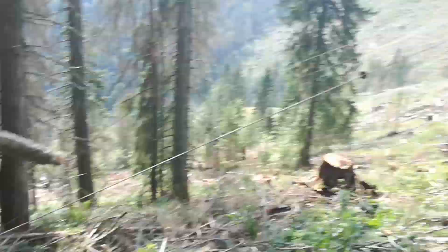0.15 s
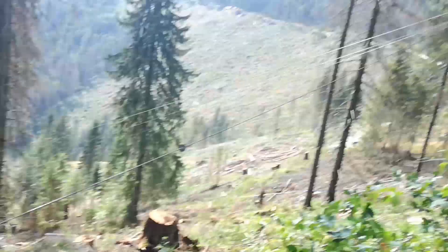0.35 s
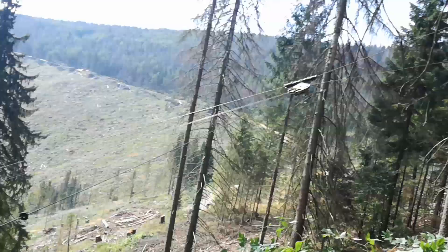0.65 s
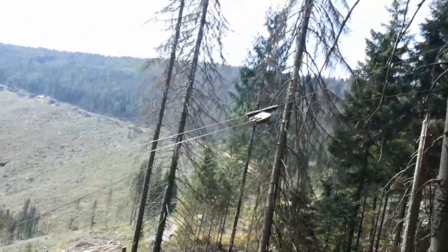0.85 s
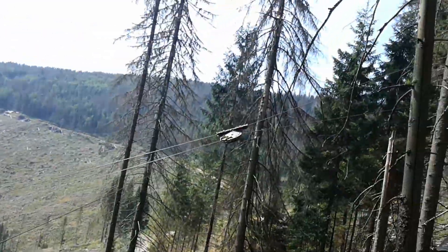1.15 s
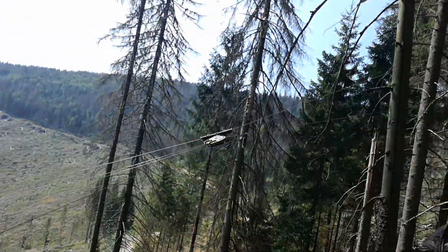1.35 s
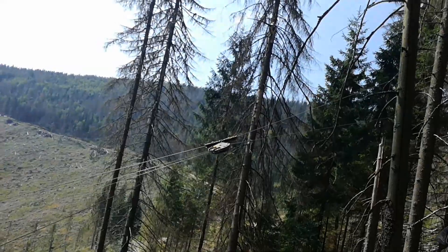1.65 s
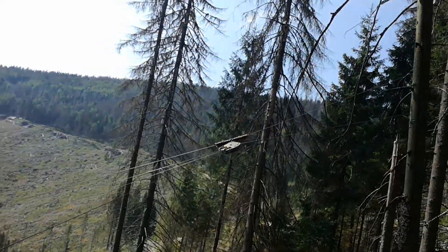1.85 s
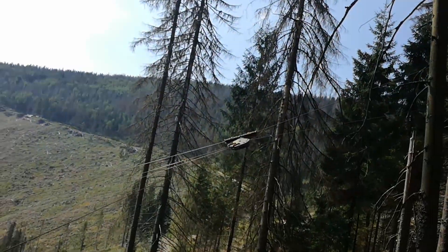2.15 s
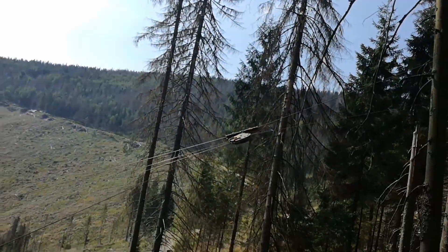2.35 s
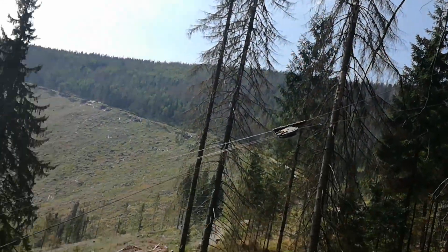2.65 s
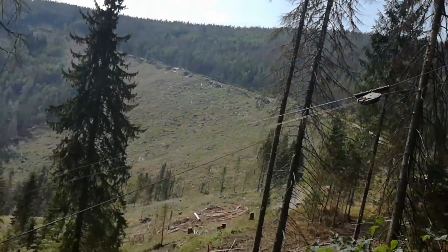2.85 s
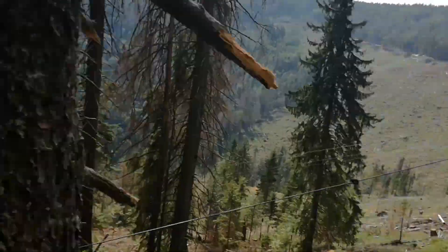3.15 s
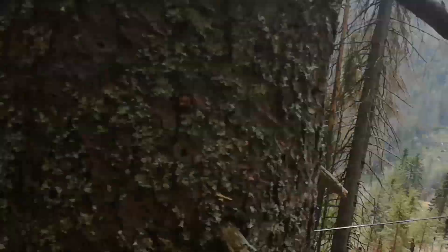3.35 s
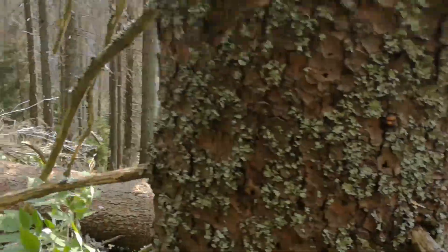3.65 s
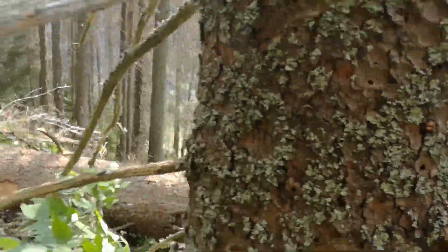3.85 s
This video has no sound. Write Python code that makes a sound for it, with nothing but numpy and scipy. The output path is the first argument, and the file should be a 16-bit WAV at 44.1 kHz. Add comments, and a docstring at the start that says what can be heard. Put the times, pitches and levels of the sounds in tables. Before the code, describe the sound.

Wood knocks ring out on a wooded slope, with scattered echoes, light wind and late rustling.

```python
"""On a forested slope, sharp woody knocks ring out and the trunks scatter them back as echoes.
Each knock is a spray of tiny cracks tinted by short tones; damped noise bursts add dull knocks and
thuds (trunk echoes, low pushes and footfalls), and clicks with a short spray make snapping twigs.
Filtered noise makes the light wind on the microphone, the far hush and a late rustle of clothing.
Wavering tones make faint far whines and thin pips."""
import sys
import numpy as np
from scipy import signal
from scipy.fft import rfft, irfft
from scipy.io import wavfile
from scipy.ndimage import uniform_filter1d

SR = 44100
rng = np.random.default_rng(int(sys.argv[2]) if len(sys.argv) > 2 else 0)


def unload_wav(signal):
    """Save mono or channel-first audio to the path in sys.argv[1] as 16-bit WAV at rate SR, clipped to [-1, 1]."""
    wavfile.write(
        sys.argv[1],
        SR,
        np.round(np.clip(np.atleast_2d(signal).T, -1, 1) * 32767).astype(np.int16),
    )


N = 176400
TIME = np.arange(N) / SR


def amp(db):
    """Turns decibels into a gain."""
    return 10 ** (np.asarray(db) / 20)


def unit(x):
    """Scales a signal to an rms level of 1."""
    return x / np.sqrt(np.mean(x ** 2) + 1e-20)


def read(points, hz):
    """Reads a table over frequency, joining its points on a log-frequency axis."""
    table_hz, value = np.transpose(points)
    return np.interp(np.log(hz + 1), np.log(table_hz), value)


def curve(rows, axis=1):
    """Joins one column of a timed table into a value for every sample."""
    rows = np.array(rows)
    return np.interp(TIME, rows[:, 0], rows[:, axis])


def add(mix, start_s, sound):
    """Mixes a stereo sound in at a time, cutting off what falls outside."""
    start = round(start_s * SR)
    sound = sound[:, max(-start, 0):]
    part = mix[:, max(start, 0):][:, :sound.shape[1]]
    part += sound[:, :part.shape[1]]


def pan(db):
    """Gives left and right gains that differ by this many dB; positive is left."""
    return amp([[db / 2], [-db / 2]])


def shelf(hz, corner_hz):
    """Steps smoothly from 0 below the corner to 1 above."""
    return hz ** 4 / (hz ** 4 + corner_hz ** 4)


def colour(x, db_at, size=4096):
    """Filters with a gain in dB over frequency, letting no sound come early."""
    log_gain = np.log(amp(db_at(abs(np.fft.fftfreq(size, 1 / SR)))))
    # The phase that goes with this gain packs the energy as early as possible.
    spectrum = np.exp(np.conj(signal.hilbert(log_gain)))
    taps = np.fft.ifft(spectrum).real[:size // 2]
    return signal.fftconvolve(x, taps[None], axes=1)[:, :x.shape[1]]


def noise(db_at, same, size=N):
    """Makes coloured stereo noise; same=1 makes both sides alike, 0 unrelated."""
    a, b = rng.standard_normal((2, size))
    same = np.clip(same, -1, 1)
    pair = np.array([a, same * a + np.sqrt(1 - same ** 2) * b])
    gain = amp(db_at(np.fft.rfftfreq(size, 1 / SR)))
    return unit(irfft(rfft(pair) * gain, size))


def burst(envelope, same=0.2, count=4):
    """Sprays tiny impulses along an envelope, with a near-even spectrum and energy 1 per side."""
    x = envelope * rng.standard_normal((2, len(envelope)))
    same = np.clip(same, 0, 1)
    x[1] = same * x[0] + np.sqrt(1 - same ** 2) * x[1]
    for _ in range(count):
        # Flatten the spectrum, then press the sound back into its envelope.
        spectrum = rfft(x)
        x = irfft(spectrum / (abs(spectrum) + 1e-12), len(envelope))
        loudness = np.sqrt(abs(uniform_filter1d(x ** 2, size=64, axis=1)) + 1e-12)
        x = x * envelope / loudness
    return x / np.linalg.norm(x, axis=1, keepdims=True)


# Colour of the far hush, the same throughout: (pitch_hz, gain_db)
AIR_COLOUR = [(100, 16), (400, -2), (750, 0.5), (1500, 2), (2000, 2), (3300, -5.5), (5300, -5.5),
              (6300, -10), (10500, -21.5), (15500, -27)]
# Slow swell of the hush, on top of its base level: (time_s, level_db)
AIR_SWELL = [(0, 9.5), (1, 10.5), (3, 6), (4, 4)]


def air(level_db=-66.5, pan_db=13):
    """The far hush of the valley is soft noise that leans left and changes level slowly."""
    hush = noise(lambda f: read(AIR_COLOUR, f), same=0.022)
    return amp(level_db + curve(AIR_SWELL)) * pan(pan_db) * hush


def from_left(x, delay_s=0.00083):
    """Sound from the left reaches the right microphone later, because the two are spaced apart."""
    padded = x.shape[1] + 128
    hz = np.fft.rfftfreq(padded, 1 / SR)
    right = irfft(rfft(x[1], padded) * np.exp(-2j * np.pi * hz * delay_s))
    return np.array([x[0], right[:x.shape[1]]])


# How strong the wind is, before each layer's own level: (time_s, level_db)
WIND_STRENGTH = [(0.0, -27.5), (0.1, -28.5), (0.51, -44), (1.24, -36.5), (1.45, -47), (2.51, -44.5),
                 (2.7, -33.5), (2.75, -41.5), (3.26, -43), (3.41, -52.5), (3.93, -38.5), (4.0, -46)]
# Colour of the low rumble: (pitch_hz, gain_db)
RUMBLE_COLOUR = [(15, -1.5), (35, 3), (65, 3.5), (110, 1), (180, -14), (280, -35.5), (450, -31), (900, -57),
                 (3000, -81)]
# Colour of the flutter: (pitch_hz, gain_db)
FLUTTER_COLOUR = [(30, -15), (90, -2), (160, 0), (260, -9.5), (400, -16.5), (700, -30.5), (1500, -62)]
# Single eddies hitting the microphone, before panning: (peak_time_s, peak_level_db, width_s)
EDDIES = [(.0095, -19.5, 0.00089), (0.037, -20, 0.00087), (0.049, -20.5, .0016), (.069, -14, 0.0011),
          (0.1368, -15.5, 0.00089), (.887, -26.5, 0.0015), (1.064, -29, .001), (1.131, -24.5, 0.0015),
          (1.1853, -22.5, 0.00065), (1.207, -24, 0.0016), (1.309, -24.5, 0.0016), (2.051, -26.5, 0.0018),
          (2.322, -33.5, 0.002), (2.573, -30.5, 0.002), (2.623, -28.5, 0.0028), (2.667, -30, .002),
          (2.687, -26.5, 0.0016), (3.782, -31, 0.00098)]


def wind(rumble_db=-3, buffet_db=0, flutter_db=-8, lumpy_db=6, cut_hz=110, size=4096):
    """Wind rumbles and flutters unevenly; each passing eddy dips the pressure for a moment."""
    lumps = noise(lambda f: -200 * shelf(f, 45), same=1)[0]
    lumpy_gain = amp(lumpy_db * np.minimum(lumps, 2))
    flutter = unit(noise(lambda f: read(FLUTTER_COLOUR, f), same=0.79) * lumpy_gain)
    rumble = noise(lambda f: read(RUMBLE_COLOUR, f), same=1.0)
    out = amp(curve(WIND_STRENGTH)) * (amp(rumble_db) * rumble + amp(flutter_db) * flutter)
    t = TIME[:size] - size / SR / 2
    low_cut = shelf(np.fft.rfftfreq(size, 1 / SR), cut_hz)
    for peak_s, db, width_s in EDDIES:
        dip = -1 / (1 + (t / width_s) ** 2)
        eddy = irfft(rfft(dip) * low_cut)
        add(out, peak_s + t[0], amp(buffet_db + db) * eddy / abs(eddy).max() * pan(3.3))
    return from_left(out)


# Colour of cracking wood: (pitch_hz, gain_db)
WOOD_COLOUR = [(420, -8), (720, -1), (1000, 3), (1250, 0), (2000, 6), (2900, 0), (4200, -0.5), (5600, -5),
               (7200, -12), (10500, -26), (16000, -30.5)]
# Tones that tint the knocks, two sets: "branch" is brighter, "trunk" lower and longer;
# the names are only labels: (pitch_hz, level_db, time_to_fall_60_db_s)
TINT_TONES = {"branch": [(930, -13, 0.027), (2003, 1, 0.022), (3690, 6, 0.0095), (5480, 0, 0.012),
              (5860, -4, 0.0089), (7620, -12, 0.011)], "trunk": [(701, 5, 0.035), (902, 1, 0.043),
              (1395, -6.5, 0.071), (1933, -0.5, 0.059), (3070, -12.5, 0.1), (4010, 1, 0.033)]}
CRACK_RISE_S, CRACK_TAIL_DB, CRACK_TAIL_S = 0.0006, -12.5, 0.011
SPLINTER_DB = 4  # unevenness of the tearing, rms
BASS_HZ, TREBLE_HZ = 1060, 3280  # corners of the tone controls


def knock(length_s, bass_db, treble_db, ring_db, tone_set, size=4096):
    """Wood fibres give way over a few milliseconds, and short fading tones tint the crack."""
    t = np.arange(size) / SR
    tearing = np.exp(-(t / length_s) ** 4) + amp(CRACK_TAIL_DB) * np.exp(-t / CRACK_TAIL_S)
    splinters = unit(uniform_filter1d(rng.standard_normal(size), size=64))
    tearing = tearing * amp(SPLINTER_DB * splinters)
    crack = burst((1 - np.exp(-t / CRACK_RISE_S)) * tearing)

    ring = np.zeros((2, size))
    for hz, db, t60_s in TINT_TONES[tone_set]:
        turns = hz * t + rng.random((2, 1))  # each side starts at its own phase
        ring += amp(db - 60 * t / t60_s) * np.sin(2 * np.pi * turns)
    ring *= np.minimum(t / length_s, 1)  # the tones build up during the crack

    body = unit(colour(crack, lambda f: read(WOOD_COLOUR, f))) + amp(ring_db) * unit(ring)

    def tone(f):
        return bass_db * (1 - shelf(f, BASS_HZ)) + treble_db * shelf(f, TREBLE_HZ)
    return unit(colour(body, tone))


# How long the far echoes last at each pitch: (pitch_hz, time_to_fall_60_db_s)
ECHO_DECAY = [(150, 1.28), (800, 1.18), (2000, 1.42), (5000, 1.09), (9000, 1.37), (15000, 2.04)]
# Colour of all the echoes: (pitch_hz, gain_db)
ECHO_COLOUR = [(100, -11), (800, -2), (2000, 0.5), (4000, -1.5), (7000, -2.5), (15000, 1.5)]
NEAR_DB, NEAR_T60_S = 4, 0.44  # near scatter: starting level, time to fall 60 dB
TRUNK_SPREAD_DB, ECHO_PATCH_DB = 2, 2.5  # unevenness in time, and over time and pitch


def forest(x, size=65536):
    """Countless trunks send back echoes: a quick near scatter and a long far tail."""
    taps = rng.standard_normal((2, size))
    spread = rng.standard_normal((1, size // 64)).repeat(64, 1)
    hz, t, z = signal.stft(taps * amp(TRUNK_SPREAD_DB * spread), SR, nperseg=256)
    far = amp(-60 * t / read(ECHO_DECAY, hz)[:, None])
    near = amp(NEAR_DB - 60 * t / NEAR_T60_S)
    patches = uniform_filter1d(rng.standard_normal(z.shape[1:]), size=8, axis=0)
    patches = unit(uniform_filter1d(patches, size=3, axis=1))
    echo_gain = amp(ECHO_PATCH_DB * patches) * (far + near) * amp(read(ECHO_COLOUR, hz))[:, None]
    tail = signal.istft(z * echo_gain, SR, nperseg=256)[1][:, :size]
    tail = tail * np.minimum(TIME[:size] / 0.00081, 1)  # short fade-in
    tail = unit(tail) / np.sqrt(size)
    return signal.fftconvolve(x, tail, axes=1)[:, :N]


# Sharp knocks, levels before the shared knock level; forest_db is relative to the direct knock:
# (start_s, level_db, length_s, bass_db, treble_db, left_minus_right_db, forest_db, ring_db, tone_set)
SHARP_KNOCKS = [(.037, -34, 0.0056, 37, 24.5, 5, 4.5, -18, "trunk"),
                (.108, -12, 0.0068, 9.5, 10.5, 1, -5, 8, "branch"),
                (0.203, -7.5, 0.0069, 5, 4, 1, -2.5, 0.5, "trunk"),
                (.5557, -29.5, 0.0079, 4.5, 12.5, 1.5, 5, -23, "branch"),
                (0.852, -47.5, 0.0047, -12, 14, 14, 8.5, -9, "branch"),
                (1.3638, -28, 0.00904, 3, -4, 4.5, 4, -8.5, "trunk"),
                (1.373, -29.5, .007, 19, 18, 3, 0.5, -10, "branch"),
                (1.483, -34, 0.0062, 15, 13.5, 1, -4, -3.5, "trunk"),
                (2.1163, -38.5, .013, 16.5, 12, 12, 2, -12.5, "trunk")]


def knocks(level_db=-16, forest_pan_db=3.0, far_ring_db=-16):
    """Knocks arrive directly and thrown back by the forest; the ring carries less far than the crack."""
    direct, sent = np.zeros((2, 2, N))
    for start_s, db, length_s, bass_db, treble_db, pan_db, forest_db, ring_db, tone_set in SHARP_KNOCKS:
        near = knock(length_s, bass_db, treble_db, ring_db, tone_set)
        far = knock(length_s, bass_db, treble_db, ring_db + far_ring_db, tone_set)
        add(direct, start_s, amp(db) * pan(pan_db) * near)
        add(sent, start_s, amp(db + forest_db) * far)
    return amp(level_db) * (direct + forest(sent) * pan(forest_pan_db))


# Twig snaps, before the shared twig level: (start_s, level_db, left_minus_right_db)
TWIG_SNAPS = [(0.189, -45, -21), (0.487, -43.5, 14), (1.366, -32.5, 10), (2.4156, -32.5, 11.5),
              (2.695, -50, 17), (3.134, -54, 16)]
# Colour of a snapping twig: (pitch_hz, gain_db)
TWIG_COLOUR = [(300, -19), (1100, -22), (1900, -12.5), (3700, -12.5), (5300, -1.5), (6400, -14.5),
               (16000, -32)]


def twigs(level_db=-17, splinter_db=2, decay_s=0.0023, forest_db=-14, size=2048):
    """Dry twigs snap close by: one click and a short splintering."""
    out = np.zeros((2, N))
    for start_s, db, pan_db in TWIG_SNAPS:
        snap = amp(splinter_db) * burst(np.exp(-TIME[:size] / decay_s))
        snap[:, 0] += 1  # the click
        snap = unit(colour(snap, lambda f: read(TWIG_COLOUR, f)))
        add(out, start_s, amp(level_db + db) * pan(pan_db) * snap)
    return out + amp(forest_db) * forest(out)


def peak(hz, centre_hz, width_hz):
    """Gives the gain in dB of a resonance with steep sides."""
    return -20 * np.log10(1 + 2 * ((hz - centre_hz) / width_hz) ** 2)


# Dull, damped knocks and thuds: trunk echoes of the sharp knocks, low pushes and footfalls,
# before the shared level: (start_s, level_db, pitch_hz, decay_s)
DULL_KNOCKS = [(.206, -25.5, 182, 0.0023), (0.243, -40, 1900, .005), (0.282, -23.5, 2150, 0.0022),
               (0.286, -25, 2400, 0.0035), (0.32, -35, 2270, 0.0026), (0.859, -41, 2040, 0.0017),
               (0.934, -46.5, 1150, .004), (1.367, -31.5, 380, 0.023), (1.409, -33.5, 2100, 0.006),
               (1.417, -35.5, 2090, .005), (1.486, -36, 805, 0.0093), (2.09, -47, 2870, 0.0022),
               (2.119, -31.5, 329, 0.011), (2.158, -34.5, 235, 0.021), (2.165, -47, 570, 0.023)]
DULL_Q, DULL_RISE_S = 4.6, 0.0006  # sharpness of the resonance (pitch / width), rise time


def dull_knocks(level_db=-16, pan_db=5, forest_db=-8, size=4096):
    """Each dull knock or thud is a short burst of noise through one broad, damped resonance."""
    out, t = np.zeros((2, N)), TIME[:size]
    for start_s, db, hz, decay_s in DULL_KNOCKS:
        envelope = (1 - np.exp(-t / DULL_RISE_S)) * np.exp(-t / decay_s)
        thud = burst(envelope, same=0.41)
        add(out, start_s, amp(level_db + db) * unit(colour(thud, lambda f: peak(f, hz, hz / DULL_Q))))
    return out * pan(pan_db) + amp(forest_db) * forest(out)


def note(length_s, pitch_hz, arch_hz=0, waver_hz=0):
    """A tone swells and fades while its pitch arches and wavers at random."""
    samples = round(length_s * SR)
    arch = np.sin(np.pi * np.arange(samples) / samples)
    waver = unit(uniform_filter1d(rng.standard_normal(N), size=400))[:samples]
    hz = pitch_hz + arch_hz * arch + waver_hz * waver
    return np.sqrt(arch) * np.sin(2 * np.pi * np.cumsum(hz) / SR)


# Faint far whines, before panning and roughening: (start_s, length_s, level_db)
FAR_WHINES = [(0.964, 0.093, -50), (1.052, 0.057, -55.5), (1.185, 0.12, -55), (2.724, 0.072, -53.5),
              (2.798, 0.047, -52)]
WHINE_HZ, WHINE_ARCH_HZ, WHINE_WAVER_HZ = 1219, 84, 24  # pitch at the ends, rise in the middle, waver


def whine(forest_db=0):
    """Short, rough, arching whines come from far off, blurred by the trees."""
    out = np.zeros((2, N))
    for start_s, length_s, db in FAR_WHINES:
        tone = note(length_s, WHINE_HZ, WHINE_ARCH_HZ, WHINE_WAVER_HZ)
        add(out, start_s, amp(db) * pan(5.3) * tone)
    # Low-pitched noise shakes the loudness and makes the tone rough.
    roughness = noise(lambda f: -12 * np.log2(1 + (f / 130) ** 2), same=.5)
    out = out * (.55 + .7 * roughness)
    return out + amp(forest_db) * forest(out)


# Strokes of sliding cloth, before panning: (time_s, level_db, treble_db)
STROKES = [(2.66, -68, -8), (2.73, -53, -17), (2.82, -55.5, -1), (2.92, -64, -15), (3.22, -64.5, -3.5),
           (3.33, -54.5, -0.5), (3.41, -44, 1), (3.52, -52, 0.5), (3.61, -51, 1.5), (3.67, -52, -5),
           (3.78, -46.5, -4), (3.9, -61, 3.5), (4, -59, -3)]
# Colour of the cloth hiss, before the bass cut: (pitch_hz, gain_db)
CLOTH_COLOUR = [(410, -33), (700, -4), (1450, -12.5), (2080, -4.5), (3630, -6.5), (5290, -2.5),
                (6180, -9.5), (8880, -12), (10400, -20), (13100, -13), (15500, -17.5)]
CLOTH_GRAIN_DB = 2  # unevenness from grain to grain


def rustle(level_db=0, bass_db=-8):
    """Cloth slides in a few strokes, a fine-grained hiss whose treble rises and falls."""
    grains = rng.standard_normal((2, N))
    grain_level = rng.standard_normal(N // 50 + 1).repeat(50)[:N]
    grains = grains * amp(CLOTH_GRAIN_DB * grain_level)
    hiss = unit(colour(grains, lambda f: read(CLOTH_COLOUR, f) + bass_db * (1 - shelf(f, 600))))
    top = irfft(rfft(hiss) * shelf(np.fft.rfftfreq(N, 1 / SR), 3860), N)
    treble_gain = amp(curve(STROKES, axis=2))
    return amp(level_db + curve(STROKES)) * pan(6.4) * (hiss + top * (treble_gain - 1))


# Thin pips far off: (start_s, length_s, level_db)
FAR_PIPS = [(2.712, 0.031, -64), (2.772, 0.1, -63.5), (2.881, 0.052, -63), (2.988, 0.046, -72),
            (3.07, 0.039, -68), (3.218, 0.033, -63), (3.278, 0.025, -58.5)]
PIP_HZ, PIP_WAVER_HZ = 5340, 9.2


def pips():
    """A run of thin, high pips wavers around one pitch, perhaps a distant bird."""
    out = np.zeros((2, N))
    for start_s, length_s, db in FAR_PIPS:
        add(out, start_s, amp(db) * note(length_s, PIP_HZ, waver_hz=PIP_WAVER_HZ)[None])
    return out


def scene():
    """Adds up everything heard on the slope."""
    return knocks() + dull_knocks() + twigs() + wind() + air() + rustle() + whine() + pips()


# How the two microphones differ in colour: (pitch_hz, left_minus_right_db)
MIC_BALANCE = [(300, 0), (900, -2), (1900, 5), (3400, -0.5), (5400, -0.5), (8000, 3.5), (15000, 3)]
EDGE_HZ = 15900  # upper edge of the band


def record(dry, ceiling=.85):
    """Two microphones of unlike colour hear it; loud peaks are rounded off and the top is cut."""
    balance_db = read(MIC_BALANCE, np.fft.rfftfreq(N, 1 / SR))
    heard = irfft(rfft(dry) * amp(np.outer([.5, -.5], balance_db)), N)
    rounded = ceiling * np.tanh(heard / ceiling)
    low_pass = signal.firwin(511, EDGE_HZ, window=("kaiser", 9), fs=SR)
    return signal.oaconvolve(rounded, low_pass[None], "same")


dry = scene()
out = record(dry)
unload_wav(out)
```